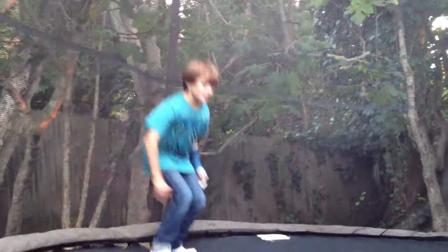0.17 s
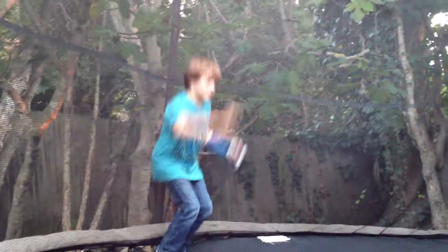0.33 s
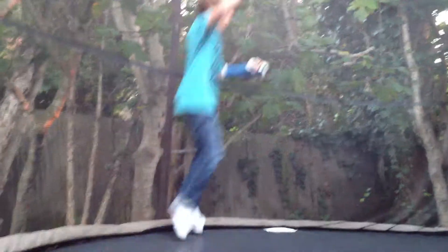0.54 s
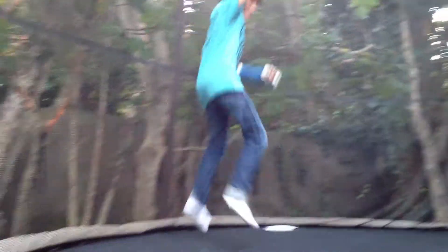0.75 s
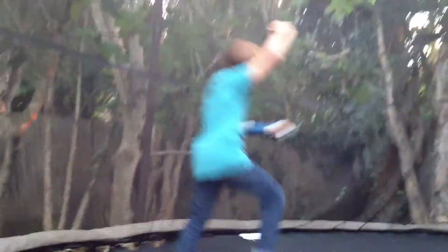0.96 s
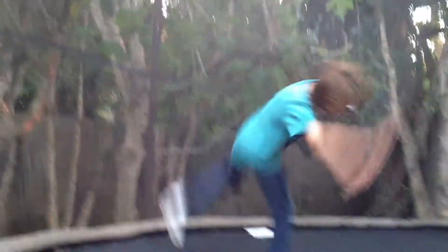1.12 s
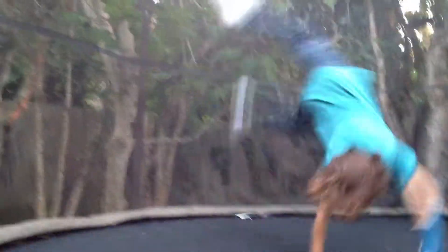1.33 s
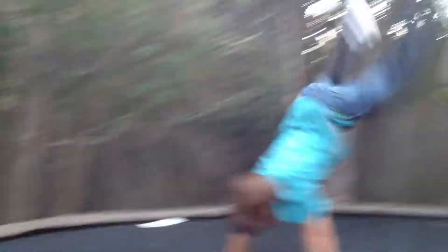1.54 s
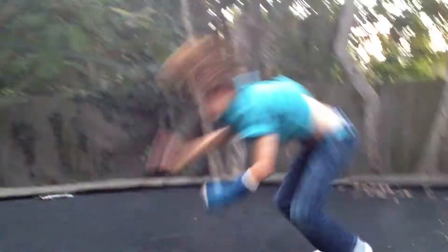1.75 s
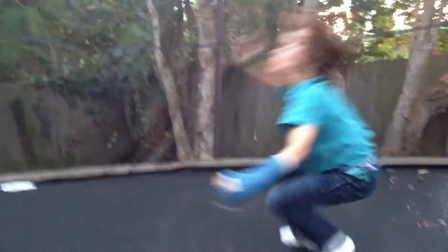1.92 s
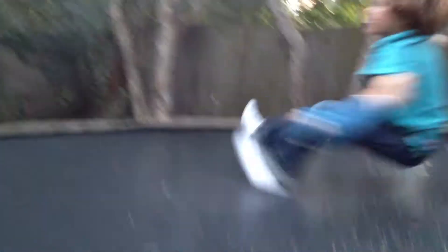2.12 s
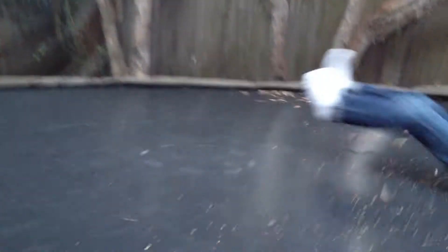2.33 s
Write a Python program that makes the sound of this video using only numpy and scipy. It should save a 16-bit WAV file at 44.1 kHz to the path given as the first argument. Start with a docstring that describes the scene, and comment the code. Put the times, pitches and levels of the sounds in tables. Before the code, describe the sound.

A trampoline being jumped on, heard close on a phone outdoors. Silence until 0.12 s, then faint traffic hum and light creaks. Scratchy, gritty rubbing rushes at 0.4-0.65 s, drops to near quiet with tiny ticks, returns at 1.0-1.4 s with soft thuds, then around 1.5 and 1.7-1.9 s with higher creaks. After a lull, the strongest scraping comes from 2.3 to 2.5 s. Short yard echo.

```python
"""After a short silence a far traffic hum sets in, and a child bounces and flips on a trampoline close to a phone.
Shoes, hands and loose grit scratch over the woven mat in rushes: many tiny slips, noise whose treble
fizzes while its lower part rings the fabric. Springs creak as narrow gliding noise, their hooks tick and the
mat drums as damped tones; fence and trees answer with a brief decaying tail.
The phone wavers, then swings round past half-way, which lifts the fabric's main resonance."""
import sys
import numpy as np
from scipy import signal
from scipy.fft import rfft, irfft, next_fast_len
from scipy.io import wavfile
from scipy.ndimage import uniform_filter1d, map_coordinates

SR = 44100
rng = np.random.default_rng(int(sys.argv[2]) if len(sys.argv) > 2 else 0)


def voltage_ratio(decibels):
    """Convert decibels (scalar or array-like) to amplitude ratios, 20 dB per decade."""
    exponent = np.asarray(decibels, float) / 20
    return 10 ** exponent


def waveform_to_disk(signal):
    """Save audio, clipped to [-1, 1], as 16-bit WAV at the path in sys.argv[1]."""
    frames = np.transpose(np.atleast_2d(signal))
    scaled = np.clip(frames, -1, 1) * 32767
    samples = np.round(scaled).astype(np.int16)
    wavfile.write(sys.argv[1], SR, samples)


N = 109235  # samples

# Spectrum of the far hum: (frequency [Hz], relative level [dB])
TRAFFIC_SPECTRUM = [(24, -60), (40, -6), (80, -19.5), (111, -4.5), (161, -1.5), (470, -5.5), (588, -7.5),
                    (773, -5), (897, -8.5), (1070, -5), (1370, -10), (2200, -9), (2680, -18), (2960, -12.5),
                    (4200, -41.5), (8210, -23), (11400, -32.5), (15300, -26.5)]
# Rubbing on the mat: (time [s], sliding speed as fizz level [dB], weight on the mat as fabric over fizz [dB])
RUBBING = [(0.13, -67.5, 2), (0.28, -60, 12), (0.38, -38.5, 1.5), (0.44, -64.5, 9.5), (0.49, -62, 11.5),
           (0.52, -36.5, 0.5), (0.57, -35, -5.5), (0.59, -47.5, 4.5), (0.6, -34.5, -6), (0.63, -50.5, 2.5),
           (0.74, -71, 4), (0.96, -65, 8.5), (0.99, -39.5, -3), (1.05, -31, 3), (1.11, -35.5, -2.5),
           (1.16, -32, -3.5), (1.25, -50, 0), (1.26, -35, -5), (1.31, -36, -1), (1.32, -29.5, -5.5),
           (1.34, -37, -2), (1.35, -33, -5.5), (1.42, -61, 7.5), (1.45, -41.5, -3.5), (1.51, -36, 5.5),
           (1.54, -37.5, 5), (1.63, -63.5, 6.5), (1.66, -67.5, 11.5), (1.68, -37.5, 2), (1.74, -50, 6.5),
           (1.77, -32, 0.5), (1.8, -27.5, 0), (1.83, -43.5, 1), (1.86, -30.5, 3), (2.01, -60.5, 9),
           (2.02, -46, 0.5), (2.07, -63, 2.5), (2.1, -43, 5.5), (2.12, -48, 3.5), (2.17, -43.5, 4),
           (2.18, -35.5, 0), (2.22, -52, 13), (2.26, -61.5, 9.5), (2.27, -38, 7.5), (2.28, -33.5, -0.5),
           (2.3, -40.5, 3), (2.34, -37.5, 2.5), (2.36, -25, 3), (2.41, -30, 0.5), (2.46, -36.5, 2),
           (2.48, -28, 3.5)]
# Turning of the phone: (time [s], angle [0 to 1])
PHONE_ANGLE = [(0, 0), (.35, 0.11), (.52, 0.32), (.62, 0.2), (1.0, 0.2), (1.2, .05), (1.32, 0.21),
               (1.42, .1), (1.5, 0.37), (1.57, 0.56), (1.7, 0.84), (1.95, 0.86), (2.2, 0.8), (2.32, 0.66),
               (2.48, 0.88)]
# Sudden snags of a sole on the weave: (time [s], level before SNAG_OFFSET_DB [dB], fabric over fizz [dB])
SNAGS = [(0.137, -48, 17.5), (0.1564, -52, -2), (0.2997, -33.5, 3), (0.3376, -29.5, 7), (0.5043, -27, 6),
         (0.5947, -19, -2), (0.9857, -24, 1), (1.0395, -22, 3), (1.321, -16.5, -21), (1.3454, -14.5, -11),
         (1.4325, -28, -7), (1.68, -23.5, -8), (2.0189, -41, -8), (2.0935, -29.5, -11), (2.1755, -28, -13),
         (2.269, -24, -8), (2.381, -18, -5)]
# Treble of the slips at phone angle 0, then 1: (frequency [Hz], relative level [dB])
FIZZ_BEFORE = [(2530, -42), (4300, -10), (5400, -1), (6200, -2.5), (6750, 2), (8710, -0.5), (9900, -10),
               (12000, -10.5), (13800, -2.5), (15300, -11)]
FIZZ_AFTER = [(2530, -31.5), (4300, -2), (4680, -18), (6790, -1.5), (8530, 0.5), (9900, -3), (10600, -1.5),
              (12300, -5.5), (13800, -3.5), (15300, -9.5)]
# Ringing of the fabric at phone angle 0, then 1: (frequency [Hz], relative level [dB])
FABRIC_BEFORE = [(150, -41), (400, -21.5), (900, -16), (1080, -10), (1250, -11), (1400, -7.5), (2160, -6),
                 (2450, 1), (2800, -2), (3350, -3.5), (3750, -16.5), (4300, -18.5), (5000, -17),
                 (6500, -37), (11000, -120)]
FABRIC_AFTER = [(150, -42.5), (400, -24.5), (800, -22.5), (1080, -12), (1400, -13), (1900, -8.5),
                (2200, -8.5), (2450, -2), (2800, -3.5), (3200, -1), (3570, 1), (4150, -7.5), (4450, -18.5),
                (4700, -22), (5200, -17), (6500, -49), (11000, -120)]
# Fabric resonances at angle 1: (frequency [Hz], width [Hz], height before MODE_OFFSET_DB [dB])
FABRIC_MODES = [(1060, 46, 3), (1670, 120, -4), (1990, 54, 1), (2400, 52, -11), (2870, 42, -9.5),
                (3450, 71, -2.5), (3600, 20, -17.5)]
# Creak of the springs: (time [s], pitch [Hz], level against the fabric [dB])
CREAK = [(.13, 2900, -5), (.23, 2940, -6), (.37, 2750, -7.5), (.46, 2750, -1.5), (.53, 3005, -7.5),
         (.62, 2520, -4.5), (.75, 2485, 4), (.92, 2470, -24), (1.0, 2487, -14), (1.1, 2492, -9.5),
         (1.24, 2480, -5), (1.34, 3050, -5), (1.44, 2500, -4), (1.5, 2900, -21), (1.58, 3530, -8.5),
         (1.8, 3667, -6.5), (1.9, 3657, -15), (2.05, 3333, -5), (2.2, 3440, -12), (2.37, 3500, -18),
         (2.48, 3400, -24)]
# Spring hooks ticking: (time [s], level before the onset ramp [dB], pitch [Hz], 60 dB decay time [s])
TICKS = [(.137, -42, 1500, .012), (.6735, -30, 13700, .003), (.6735, -36, 11000, .003),
         (.7798, -54, 12900, .04), (.8252, -50, 15000, .03), (.8252, -58, 13200, .2),
         (1.4503, -42, 15000, .04)]
# The mat drumming under a landing: (time [s], level before the onset ramp [dB], pitch [Hz], 60 dB decay time [s])
THUDS = [(1.04, -45, 425, 0.18), (1.125, -43, 373, 0.14), (1.735, -40, 103, 0.099), (1.72, -41, 185, 0.096),
         (1.77, -42, 170, .08), (1.725, -41, 370, 0.11), (1.7, -44, 191, 0.12), (1.92, -41.5, 488, 0.091),
         (2.065, -40.5, 370, 0.091)]

START_S = 0.12  # sound sets in
TRAFFIC_DB = -52  # mean level, about which the swells move
FLICKER_DB, FAST_FLICKER_DB = 0.8, 1.1  # depth of the sliding's unevenness
SLIPS_PER_S, LARGEST_SLIP = 5000, 2.2  # mean rate; cap on size, in mean sizes
SNAG_T60_S, SNAG_OFFSET_DB = 0.036, -11.5
MODE_OFFSET_DB = -6
CREAK_KNOTS_PER_S = 130  # sets the width of the noise ridge, roughly as many Hz
YARD_T60_S, YARD_DB = 0.17, -8.5
TOP_HZ, LOW_HZ = 15330, 105  # band limits of the phone


def unit(x):
    """Normalisation to an rms of 1."""
    return x / np.sqrt(np.mean(x ** 2) + 1e-20)


def curves(rows):
    """Linear interpolation in time: one value per sample for each column after the time."""
    s, *columns = np.transpose(rows)
    return [np.interp(np.arange(N) / SR, s, column) for column in columns]


def wobble(rate):
    """Band-limited randomness: a smooth curve through `rate` random knots a second."""
    knots = rng.standard_normal(int(N * rate / SR) + 4)
    return map_coordinates(knots, [np.arange(N) * rate / SR])


def coloured(x, points, modes=()):
    """Minimum-phase filtering: a causal response to a given spectrum plus resonances, at unit gain for noise."""
    m = 2 * next_fast_len(N // 2 + 4096)
    hz = np.fft.rfftfreq(m, 1 / SR)
    f, db = np.transpose(points)
    gain = voltage_ratio(np.interp(np.log(hz + 1), np.log(f + 1), db))
    peaks = sum(voltage_ratio(d + MODE_OFFSET_DB) * w / np.hypot(w, 2 * (hz - centre)) for centre, w, d in modes)
    gain = gain * (1 + peaks)
    cepstrum = irfft(np.log(gain / np.sqrt(np.mean(gain ** 2)) + 1e-5), m)
    # folding the cepstrum onto positive times makes the filter causal
    cepstrum[1:m // 2] *= 2
    cepstrum[m // 2 + 1:] = 0
    return irfft(rfft(x, m) * np.exp(rfft(cepstrum)), m)[:N]


def traffic():
    """Superposition of many distant sources: steady coloured noise whose level swells slowly."""
    swell_db = 0.8 * wobble(3) + 1.1 * wobble(14)
    return voltage_ratio(TRAFFIC_DB + swell_db) * coloured(rng.standard_normal(N), TRAFFIC_SPECTRUM)


def sliding_drive():
    """Frictional excitation: sliding speed drives the fizz, and weight on the mat adds to the fabric's share."""
    speed_db, weight_db = curves(RUBBING)
    fizz_drive = voltage_ratio(speed_db + FLICKER_DB * wobble(35.34) + FAST_FLICKER_DB * wobble(180))
    return fizz_drive, fizz_drive * voltage_ratio(weight_db)


def slips(spread_db, smooth):
    """Stick-slip friction: random impulses of uneven size over `smooth` times as much steady noise."""
    hit = rng.random(N) < SLIPS_PER_S / SR
    size = np.minimum(rng.exponential(size=N), LARGEST_SLIP)
    impulses = unit(hit * voltage_ratio(spread_db * size) * rng.standard_normal(N))
    return unit(impulses + smooth * rng.standard_normal(N))


def phone_blend(x, before, after, modes=()):
    """Directional colouring: a constant-power crossfade between two spectra as the phone turns."""
    turn = np.clip(curves(PHONE_ANGLE)[0], 0, 1)
    signs = rng.choice([-1, 1], N)  # makes the two parts independent
    return coloured(x * np.sqrt(1 - turn), before) + coloured(x * np.sqrt(turn) * signs, after, modes)


def patchy(x, patch_db, bins, frames):
    """Changing contact: narrow resonances come and go at random as it moves, at the same mean power."""
    z = signal.stft(x, nperseg=512)[2]
    field = uniform_filter1d(rng.standard_normal(z.shape), bins, 0)
    field = uniform_filter1d(field, frames, 1)
    varied = signal.istft(z * voltage_ratio(patch_db * unit(field)), nperseg=512)[1][:N]
    return varied * voltage_ratio(-patch_db ** 2 * np.log(10) / 20)


def rubbing(fizz_drive, fabric_drive):
    """Excitation and resonance: slips and sharp snags sound as treble fizz and through the fabric."""
    t = np.arange(N) / SR
    for s, db, over_db in SNAGS:
        burst = voltage_ratio(db + SNAG_OFFSET_DB - 60 * np.abs(t - s) / SNAG_T60_S) * (t >= s)
        fizz_drive = np.hypot(fizz_drive, burst)  # powers add
        fabric_drive = np.hypot(fabric_drive, burst * voltage_ratio(over_db))
    fizz = fizz_drive * slips(spread_db=1.5, smooth=1.6)
    fabric = fabric_drive * slips(spread_db=2, smooth=1.5)
    fizz = phone_blend(fizz, FIZZ_BEFORE, FIZZ_AFTER)
    fabric = phone_blend(fabric, FABRIC_BEFORE, FABRIC_AFTER, FABRIC_MODES)
    return patchy(fizz, patch_db=2.8, bins=2, frames=9) + patchy(fabric, patch_db=3, bins=2, frames=7)


def creak(fabric_drive):
    """Narrow-band noise: two random quadratures about the springs' gliding pitch follow the fabric's drive."""
    hz, over_db = curves(CREAK)
    phase = 2 * np.pi * np.cumsum(hz) / SR
    ridge = wobble(CREAK_KNOTS_PER_S) * np.cos(phase) + wobble(CREAK_KNOTS_PER_S) * np.sin(phase)
    return fabric_drive * voltage_ratio(over_db) * unit(ridge)


def rings(rows, attack_s):
    """Free damped vibration: each tone sets in over attack_s, then decays exponentially."""
    total = np.zeros(N)
    for s, db, hz, t60 in rows:
        u = np.maximum(np.arange(N) / SR - s, 0)  # time since the onset
        envelope = voltage_ratio(db - 60 * u / t60) * (1 - np.exp(-u / attack_s))
        total += envelope * np.sin(2 * np.pi * hz * u)
    return total


def ticks():
    """Impact of small stiff bodies: the spring hooks ring with a very short onset."""
    return rings(TICKS, attack_s=0.00018)


def yard(x):
    """Diffuse reflection: fence and trees answer with an exponentially decaying noise tail."""
    age_s = np.arange(SR // 2) / SR
    tail = rng.standard_normal(SR // 2) * voltage_ratio(-60 * age_s / YARD_T60_S)
    delayed = np.pad(x, (400, 0))  # about 9 ms
    return signal.fftconvolve(delayed, tail / np.linalg.norm(tail))[:N]


def thuds():
    """Membrane vibration: the mat drums under landings as damped tones with a soft onset."""
    return rings(THUDS, attack_s=0.0042)


def scene():
    """Superposition: mat and springs with their echo, the ticks and the hum."""
    fizz_drive, fabric_drive = sliding_drive()
    near = rubbing(fizz_drive, fabric_drive) + creak(fabric_drive) + thuds()
    mix = traffic() + near + ticks() + voltage_ratio(YARD_DB) * yard(near)
    return mix[None]


def roll_off(x):
    """The treble ends steeply here."""
    return signal.sosfilt(signal.butter(12, 16500, fs=SR, output="sos"), x)


def record(dry):
    """Band limitation: the phone cuts the bass gently and the top sharply; silence precedes the onset."""
    hz = np.fft.rfftfreq(2 * N, 1 / SR)
    response = (hz < TOP_HZ) / np.hypot(1, (LOW_HZ / (hz + 1)) ** 2)
    kept = irfft(rfft(dry, 2 * N) * response, 2 * N)[:, :N]
    mix = kept * (np.arange(N) >= START_S * SR)
    return roll_off(mix)


dry = scene()
out = record(dry)
waveform_to_disk(out)
```